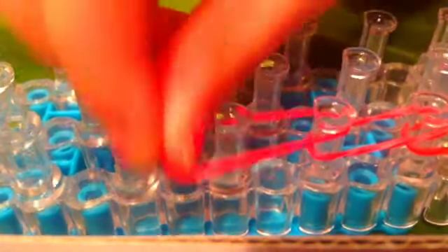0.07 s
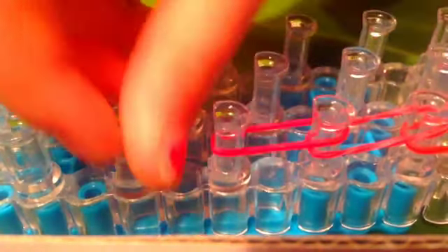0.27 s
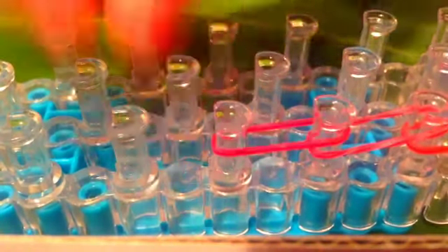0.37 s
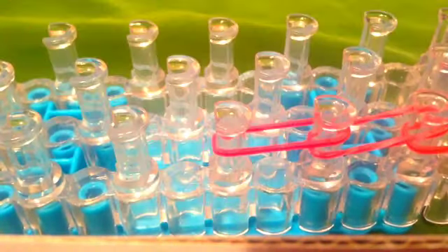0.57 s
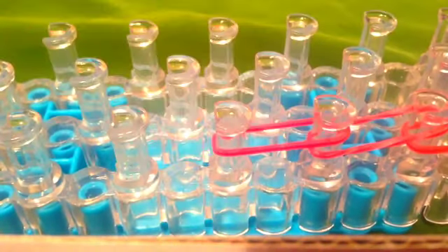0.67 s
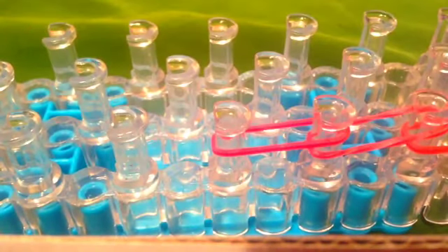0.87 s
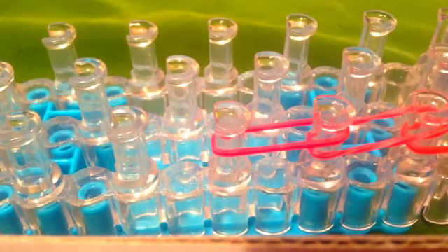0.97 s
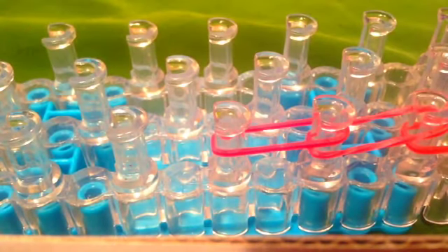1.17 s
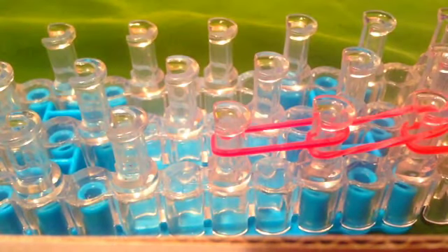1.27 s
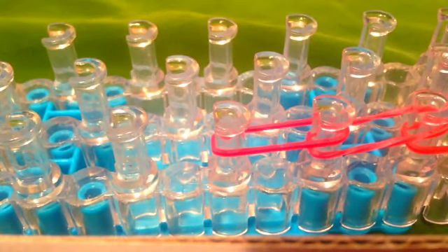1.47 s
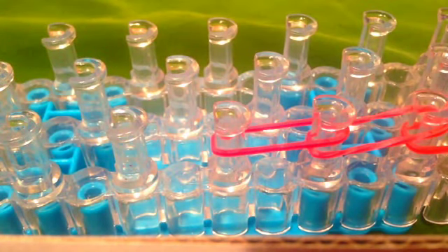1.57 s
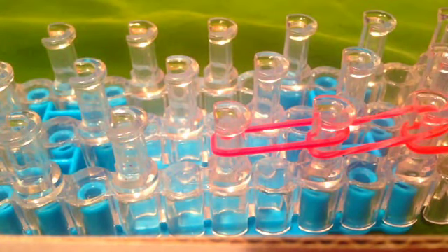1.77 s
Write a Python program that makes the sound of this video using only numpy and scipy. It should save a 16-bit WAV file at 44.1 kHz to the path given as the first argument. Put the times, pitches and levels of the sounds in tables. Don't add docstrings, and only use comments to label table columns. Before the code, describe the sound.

A stretched rubber band slaps a hollow plastic peg with one bright, dry crack, after low finger rumble and soft rubbing; the hand lifts away with small clicks, leaving faint ticks and hiss, heard close in a small room.

```python
import sys
import numpy as np
from scipy import signal
from scipy.fft import rfft, irfft, next_fast_len
from scipy.io import wavfile
from scipy.ndimage import map_coordinates

SR = 44100
rng = np.random.default_rng(int(sys.argv[2]) if len(sys.argv) > 2 else 0)


def invert_db(x):
    u = np.asarray(x, float) / 20
    return 10 ** u


def inscribe(sig):
    pcm = np.round(np.clip(np.atleast_2d(sig).T, -1, 1) * 32767)
    wavfile.write(sys.argv[1], SR, pcm.astype(np.int16))


N = 79380

# (frequency [Hz], density [dB per Hz])
HUM_SPECTRUM = [(24, -61), (40, -23), (234, -5), (293, -19), (325, -3), (399, -11.5), (467, -14),
                (616, -3.5), (2500, -32), (3250, -80), (5500, -120)]
# (time [s], level [dB])
HUM_LEVEL = [(.35, -64.5), (0.5, -65), (0.622, -68), (0.764, -67.5), (0.868, -66), (0.962, -68.5),
             (1.006, -66), (1.45, -67), (1.8, -66.5)]
# (frequency [Hz], width [Hz], level [dB])
HUM_MODES = [(158, 39, -12), (239.5, 13, -6.5), (335, 19.3, -16), (398.3, 24.4, -9.5), (622, 7, -9.5),
             (775.6, 16, -8.5), (934, 87, -13)]
# (time [s], level [dB])
DRONE_LEVEL = [(.97, -95), (1.02, -68), (1.07, -67), (1.16, -66.5), (1.21, -82), (1.26, -64.5), (1.35, -72),
               (1.42, -79.5)]
# (time [s], rise [s], level [dB], t60 [s])
STIRS = [
    (1.0, 0.04, -71, 0.36),
]
# (frequency [Hz], width [Hz], level [dB])
STIR_MODES = [(335, 27, 7), (650, 22, -8), (775, 33, -13), (1200, 390, -23)]
# (time [s], level [dB])
PRESS_LEVEL = [(0.0, -60), (0.014, -46.5), (0.04, -58.5), (0.052, -52.5), (0.092, -54), (.15, -53.5),
               (0.19, -53), (.3, -59.5), (.33, -63), (.355, -56), (.4, -64.5), (.5, -95)]
# (frequency [Hz], width [Hz], level [dB])
PRESS_BODY = [(120, 50, -2), (200, 73, -3.5), (325, 46, -3.5), (405, 114, -11.5), (725, 77, -19.5),
              (960, 140, -27.5), (1500, 210, -23.5)]
# (time [s], level [dB])
RUB_LEVEL = [(0, -61.5), (.04, -71), (.076, -68.5), (.085, -60), (.12, -65), (.14, -63.5), (.33, -66),
             (.385, -61.5), (.43, -74), (.5, -81), (1.03, -88), (1.045, -73), (1.09, -78), (1.15, -76),
             (1.17, -66), (1.2, -90)]
# (frequency [Hz], density [dB per Hz])
SKIN_SPECTRUM = [(1200, -43), (2500, -3), (3200, 4.5), (5500, 4.5), (7000, -3), (8500, -1), (13000, -5.5),
                 (15300, 0)]
# (time [s], pitch [Hz], level [dB])
TWANG = [(0, 318.6, -67), (0.029, 343.7, -60), (.055, 345, -68), (.075, 335, -56.5), (.13, 303, -56.5),
         (0.169, 300, -67), (.33, 301.8, -77), (0.354, 325, -53.5), (.39, 347.3, -68), (.42, 350, -85.5)]
# (time [s], level [dB], centre [Hz], spread [Hz])
TICKS = [
    (.0802, -40, 15100, 1300),
    (0.079, -38, 670, 200),
    (.082, -54, 5000, 2500),
    (0.38, -52, 14900, 1500),
    (.8739, -46, 3690, 695),
    (1.042, -49, 2230, 1500),
    (1.058, -48, 3300, 900),
    (1.075, -54, 3520, 910),
]
# (time [s], peak [dB], pitch [Hz], width [Hz])
TAPS = [(.3800, -53.5, 4800, 130), (.3803, -46.5, 3380, 350), (.3836, -52.5, 4720, 150),
        (.3838, -50, 3587, 500), (.3835, -57, 6300, 500), (.3890, -52, 5140, 200), (.8745, -55, 6000, 1200),
        (1.4868, -51.5, 5600, 890), (1.4868, -54, 500, 700), (1.4870, -63, 8000, 1250),
        (1.4890, -47, 5000, 1500), (1.4892, -55, 3200, 300), (1.4888, -50.5, 1220, 403),
        (1.4940, -57, 5740, 710)]
# (time [s], level [dB], brightness [dB per octave])
SLAPS = [(.2110, -16, 0), (.21188, 5, 1), (.21245, 3, 1), (.21302, 17.5, 2), (.21368, 13, 1),
         (.2142, 7, -5), (.2155, 4, -1), (.2165, 2, -5), (.2181, -3, -3), (.2196, -8, -1), (.2216, -8, -2)]
# (frequency [Hz], width [Hz], level [dB])
PEG_BODY = [(6400, 420, -17), (7330, 420, -18.5), (8420, 310, -7), (11100, 270, -12), (12490, 570, -2.5),
            (13900, 500, -6.5), (14500, 320, -11), (15260, 640, 2)]
# (frequency [Hz], level [dB], t60 [s])
TUBE_MODES = [(1370, -37, .02), (2060, -30, .018), (3260, -25, .02), (3750, -19, .017), (4300, -27, .013),
              (4560, -22, .016), (5150, -26, .014), (5510, -22, .016)]
# (frequency [Hz], level [dB], t60 [s])
BOARD_MODES = [(154.8, -44, 0.25), (188, -39.5, 0.38), (300, -33, 0.075), (328.7, -33.5, 0.14),
               (371, -44, 0.3), (445, -36, 0.22), (529.7, -40.5, 0.2), (589, -22.5, 0.03),
               (677, -41.5, 0.14), (836, -31.5, 0.065), (979, -34, 0.075)]
# (frequency [Hz], t60 [s])
WALL_T60 = [(150, 0.34), (700, 0.45), (2000, 0.41), (5000, 0.37), (12000, 0.28), (16000, 0.3)]
# (frequency [Hz], width [Hz], level [dB])
WALL_COLOUR = [(1360, 790, -2.5), (3300, 530, 2), (3790, 270, 5), (4410, 270, -2), (5380, 470, 0.5),
               (6950, 320, -8), (8350, 1150, -8), (11000, 1350, -7.5), (13000, 830, -1), (13600, 800, -2.5),
               (15300, 930, 0.5)]
# (frequency [Hz], density [dB per Hz])
HISS_SPECTRUM = [(880, -11), (1500, -2), (1640, -3.5), (1790, -4.5), (4730, -5.5), (9100, -6),
                 (16000, -8.5)]

BLOW_S = 0.2128
STEADY_TOP_HZ = 15880


def unit(x):
    return x / np.sqrt(np.mean(x ** 2) + 1e-20)


def along(points, hz):
    f, v = np.transpose(points)
    return np.interp(np.log(hz + 1), np.log(f + 1), v)


def curve(rows):
    return np.interp(np.arange(N) / SR, *np.transpose(rows))


def since(start_s):
    return np.clip(np.arange(N) / SR - start_s, 0, None)


def wobble(rate_hz):
    knots = rng.standard_normal(int(N * rate_hz / SR) + 4)
    return map_coordinates(knots, [np.arange(N) * rate_hz / SR])


def filtered(x, response):
    m = next_fast_len(N + SR // 2)
    return irfft(rfft(x, m) * response(np.fft.rfftfreq(m, 1 / SR)), m)[..., :N]


def body(peaks):
    def response(f):
        total = 0
        for k, (hz, width_hz, db) in enumerate(peaks):
            resonance = 1j * f * width_hz / (hz * hz - f * f + 1j * f * width_hz)
            total = total + (-1) ** k * invert_db(db) * resonance
        return total
    return response


def burst(start_s, db, t60_s, rise_s=0.00017):
    t = since(start_s)
    decay = invert_db(db - 60 * np.minimum(t / t60_s, 3))
    return decay * (1 - np.exp(-t / rise_s)) * rng.standard_normal(N)


def unsteady_tone(hz, db, rough_db, drift):
    phase = 2 * np.pi * np.cumsum(hz * (1 + drift * wobble(41))) / SR
    return invert_db(db + 3.5 + rough_db * wobble(35.5)) * np.sin(phase)


def room():
    broad = unit(filtered(rng.standard_normal(N), lambda f: invert_db(along(HUM_SPECTRUM, f))))
    broad = broad * invert_db(0.94 * wobble(12.53))
    modes = 0
    for mode in HUM_MODES:
        drive = rng.standard_normal(N) * invert_db(0.96 * wobble(6.55))
        modes = modes + filtered(drive, body([mode]))
    return invert_db(curve(HUM_LEVEL) + 1.5) * (broad + invert_db(-2) * unit(modes))


def appliance():
    return unsteady_tone(405, curve(DRONE_LEVEL) - 0.6, rough_db=2.4, drift=0.013)


def stirs():
    return sum(4 * filtered(burst(s, db, t60_s, rise_s), body(STIR_MODES)) for s, rise_s, db, t60_s in STIRS)


def walls(x):
    delay_s = 0.0079
    hz, t, z = signal.stft(rng.standard_normal(SR // 2), SR, nperseg=256)
    decay = invert_db(-60 * t / along(WALL_T60, hz)[:, None])
    tail = signal.istft(z * decay, SR, nperseg=256)[1]
    delayed = np.pad(x, (int(delay_s * SR), 0))
    return signal.fftconvolve(delayed, tail / np.linalg.norm(tail))[:N]


def ticks():
    total = 0
    for s, db, hz, width_hz in TICKS:
        colour = body([(hz, width_hz, 0)])
        total = total + filtered(burst(s, db, t60_s=0.029), lambda f: colour(f) ** 2)
    return total


def taps():
    total = 0
    for s, db, hz, width_hz in TAPS:
        t = since(s)
        total = total - invert_db(db) * np.exp(-np.pi * width_hz * t) * np.sin(2 * np.pi * hz * t)
    return total


def hand_press():
    lumps = invert_db(3.5 * wobble(60))
    return invert_db(curve(PRESS_LEVEL)) * unit(lumps * filtered(rng.standard_normal(N), body(PRESS_BODY)))


def hand_rub():
    slips_per_s = 5200
    chance, size = rng.random((2, N))
    slips = (chance < slips_per_s / SR) * (size - 0.5) * invert_db(1.2 * wobble(40))
    rub = unit(filtered(slips, lambda f: invert_db(along(SKIN_SPECTRUM, f)) * (f > 800)))
    return invert_db(curve(RUB_LEVEL)) * rub


def twang():
    rows = np.array(TWANG)
    hz, db = curve(rows[:, :2]), curve(rows[:, ::2])
    return unsteady_tone(hz, db, rough_db=5, drift=0.041)


def rattle():
    thin_below_hz = 6850
    scrape = burst(0.2140, db=-12.5, t60_s=0.046)
    return filtered(scrape, lambda f: body(WALL_COLOUR)(f) * 1j * f / (thin_below_hz + 1j * f))


def board():
    rough, rise_s = 0.25, 0.00095
    t = since(BLOW_S)
    ring = 0
    for hz, db, t60_s in BOARD_MODES:
        level = invert_db(db - 60 * t / t60_s) * (1 + rough * wobble(51.3))
        ring = ring + level * np.sin(2 * np.pi * hz * t + rough * wobble(40))
    return ring * (1 - np.exp(-t / rise_s))


def peg_tube():
    gain_db, rise_s = 0.8, 0.00082
    t = since(0.2126)
    ring = 0
    for k, (hz, db, t60_s) in enumerate(TUBE_MODES):
        ring = ring + (-1) ** k * invert_db(gain_db + db - 60 * t / t60_s) * np.sin(2 * np.pi * hz * t)
    return ring * (1 - np.exp(-t / rise_s))


def peg_slaps():
    gain_db = -1.5

    def slaps(f):
        total = 0
        for s, db, tilt in SLAPS:
            level = invert_db(gain_db + db + tilt * np.log2(f / 15000 + 0.05))
            total = total + level * np.exp(-2j * np.pi * f * s)
        return total
    return filtered(np.arange(N) == 0, lambda f: slaps(f) * body(PEG_BODY)(f))


def scene():
    base = board()
    small = ticks() + taps()
    spread = filtered(np.arange(N) == round(BLOW_S * SR), body(WALL_COLOUR))
    wet = walls(invert_db(-6) * spread + invert_db(-14) * base + 0.37 * small)
    background = room() + appliance() + stirs()
    hand = hand_press() + hand_rub() + twang()
    steady = background + wet + small + hand + rattle()
    steady = filtered(steady, lambda f: f < STEADY_TOP_HZ)
    return (steady + base + peg_tube() + peg_slaps())[None]


def band_limit(x):
    return signal.sosfilt(signal.butter(12, 17170, fs=SR, output="sos"), x)


def record(dry):
    low_cut_hz, top_hz = 99, 17100
    port = body([(2630, 450, 0)])

    def microphone(f):
        bass_cut = (1j * f / (low_cut_hz + 1j * f)) ** 2
        shelf = 0.35 + 0.73 / (1 + (90 / (f + 1)) ** 8)
        return bass_cut * shelf * (1 - port(f))
    hiss = filtered(rng.standard_normal(N), lambda f: invert_db(along(HISS_SPECTRUM, f)) * (f < STEADY_TOP_HZ))
    top = signal.cheby2(7, 40, top_hz, fs=SR, output="sos")
    mix = signal.sosfilt(top, filtered(dry, microphone)) + invert_db(-66.5) * unit(hiss)
    return band_limit(mix)


dry = scene()
out = record(dry)
inscribe(out)
```